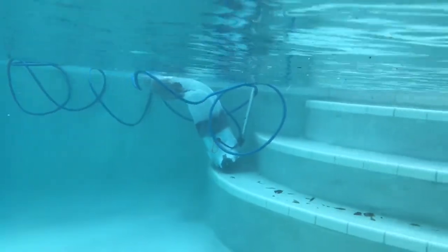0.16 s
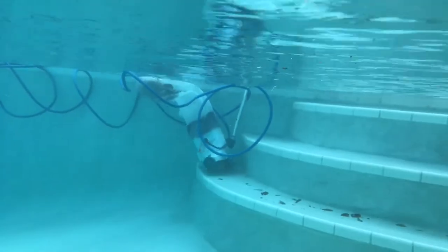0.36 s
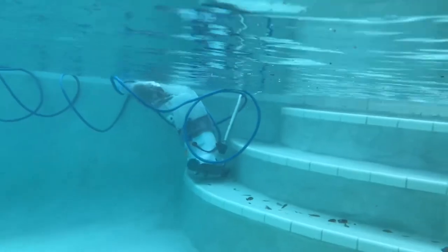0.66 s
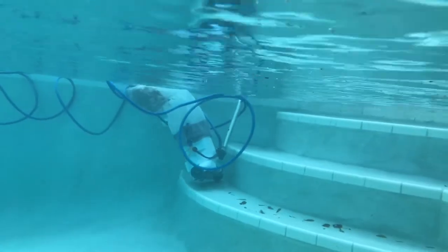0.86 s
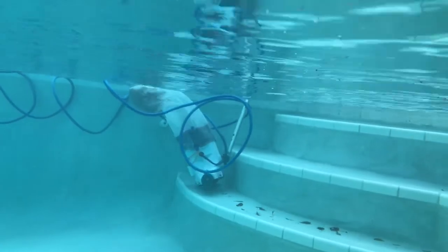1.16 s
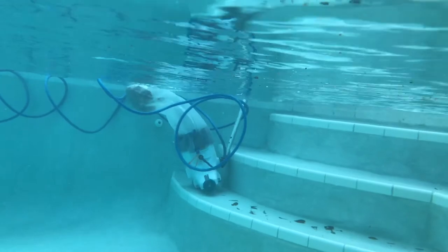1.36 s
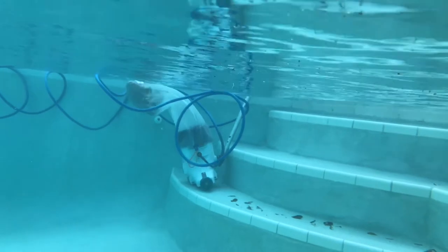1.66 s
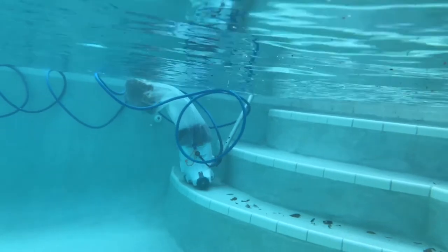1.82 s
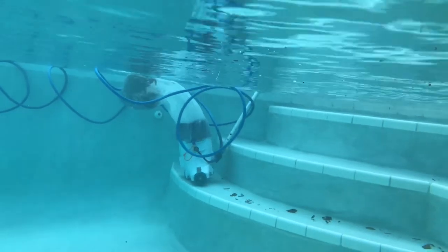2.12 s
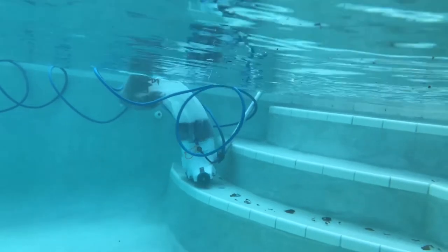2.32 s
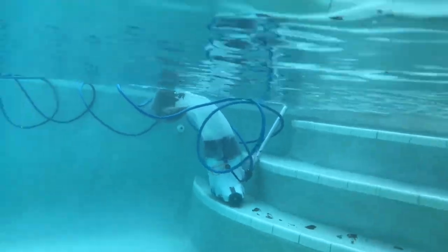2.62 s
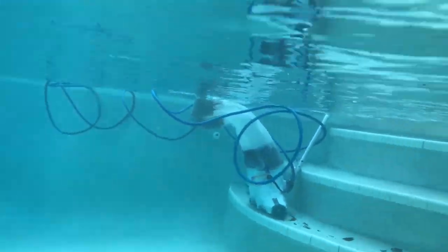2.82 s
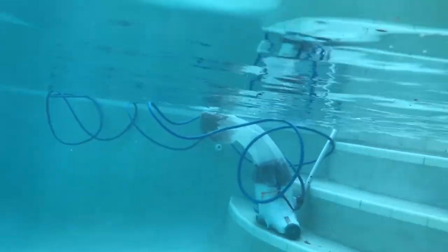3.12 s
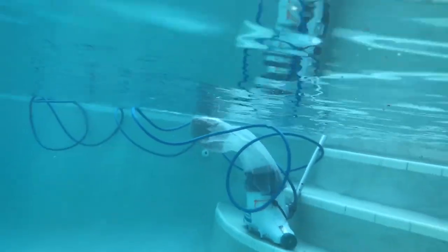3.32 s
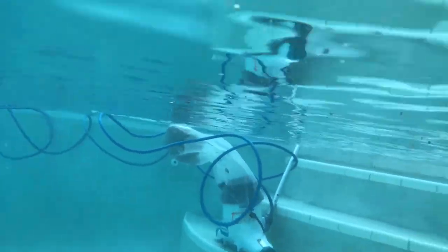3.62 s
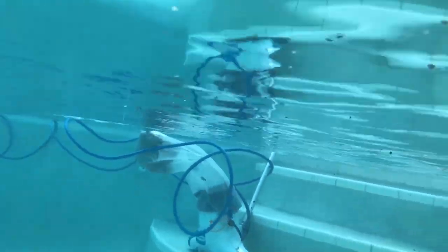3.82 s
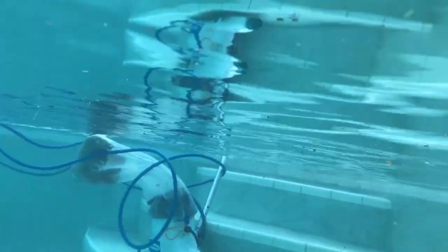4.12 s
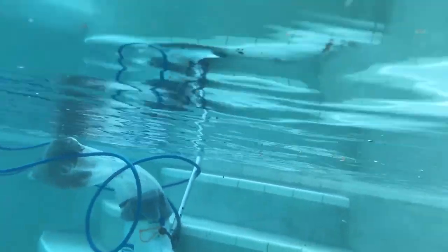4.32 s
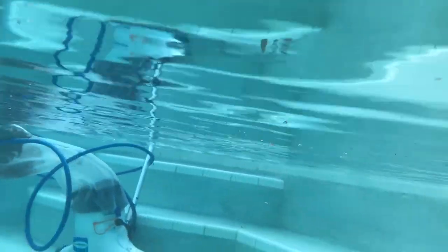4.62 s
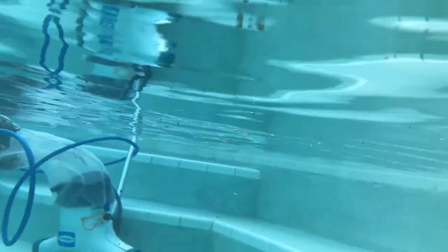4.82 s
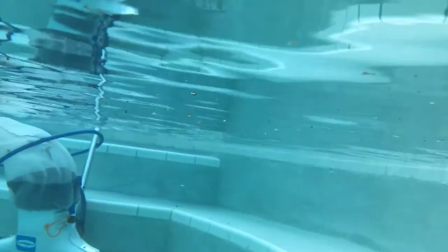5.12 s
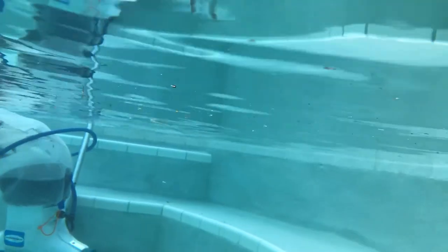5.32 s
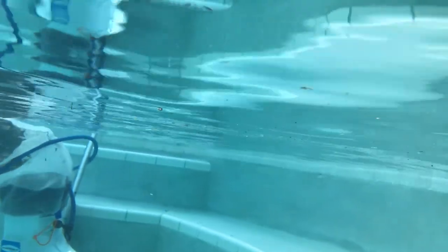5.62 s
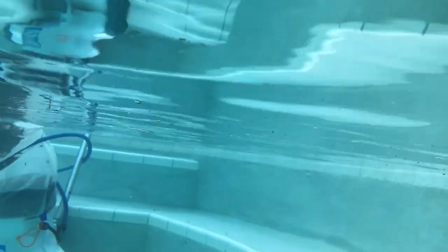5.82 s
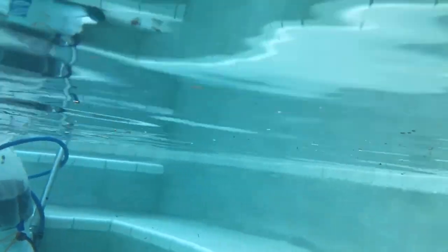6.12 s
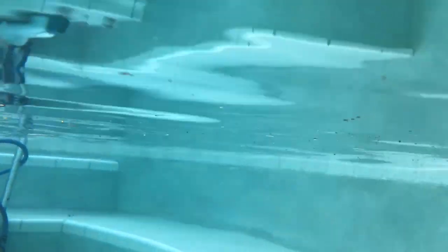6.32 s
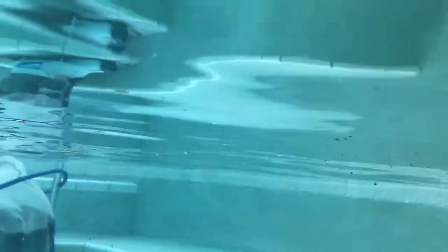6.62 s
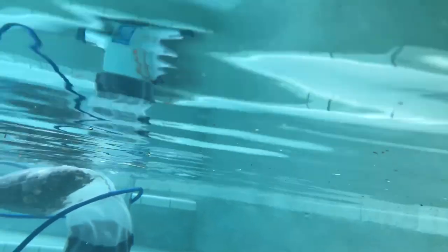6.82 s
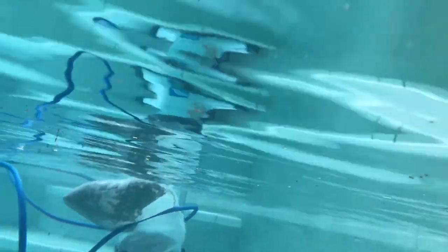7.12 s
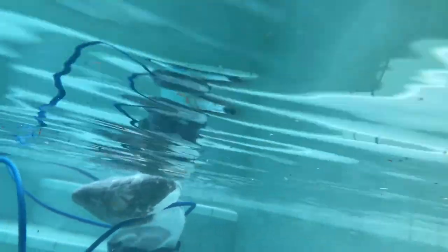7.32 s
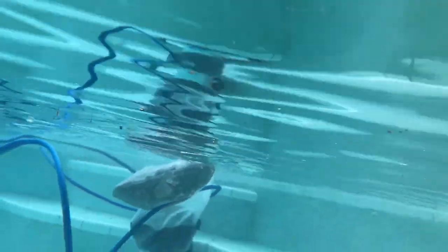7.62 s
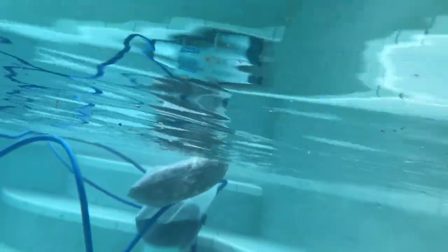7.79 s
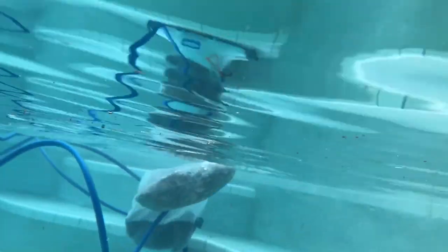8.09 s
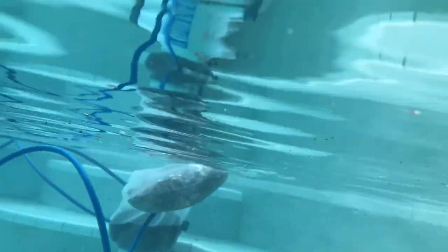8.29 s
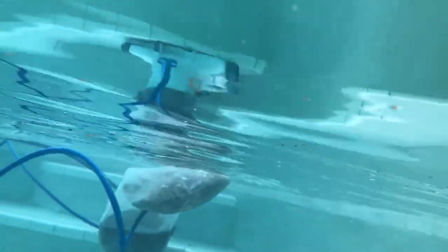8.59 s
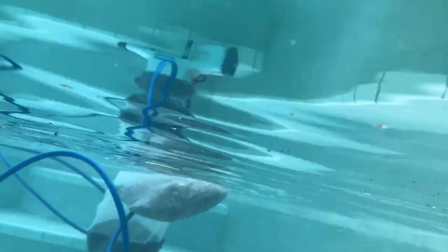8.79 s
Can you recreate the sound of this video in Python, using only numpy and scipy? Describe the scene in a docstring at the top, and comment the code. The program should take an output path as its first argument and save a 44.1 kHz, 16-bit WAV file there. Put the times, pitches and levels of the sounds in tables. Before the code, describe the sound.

A close, boxy underwater capture: rough mid-range pump drone resonates in a plastic housing, wavering with the water. Handling noise dominates in bursts: hard knocks with short hollow rings, scratchy skin rubs and dry plastic snaps, loudest just after five seconds. Between them are little bubble pings, deep soft glugs, low pressure slosh and thin crackling fizz. The drone gets brighter in the second half, and no knocks follow seven seconds, only lighter ticks.

```python
"""Underwater pump heard through a camera housing

A pool cleaner's pump drones under water: noise excites the resonant modes of a hand-held camera's shell.
Fingers knock (decaying modal sines), rub (noise gated by stick-slip) and tick (filtered noise bursts) on it.
Bubbles ping and gurgle as damped sines of gliding pitch; low glugs are sines that fall in pitch.
Behind them, shaped noise of wavering level makes the swish, the low slosh and the fizz of moving water.
"""
import sys
import numpy as np
from scipy import signal
from scipy.fft import rfft, irfft, next_fast_len
from scipy.io import wavfile
from scipy.ndimage import uniform_filter1d

SR = 44100
rng = np.random.default_rng(int(sys.argv[2]) if len(sys.argv) > 2 else 0)


def how_loud(loudness_db):
    """Turn decibels into a plain amplitude multiplier (0 dB gives 1, 20 dB gives 10)."""
    steps = np.asarray(loudness_db, float) / 20
    return 10 ** steps


def waveform_to_disk(signal):
    """Save audio, clipped to [-1, 1], as 16-bit WAV at the path in sys.argv[1]."""
    frames = np.transpose(np.atleast_2d(signal))
    scaled = np.clip(frames, -1, 1) * 32767
    samples = np.round(scaled).astype(np.int16)
    wavfile.write(sys.argv[1], SR, samples)


N = 394694  # length [samples]

# Modes of the plastic shell, two lowest first, main ones from the sixth:
# (frequency [Hz], nominal width [Hz], relative level [dB], share of the upper modes' swell [ratio])
HOUSING_MODES = [(156, 150, 2, 0), (247, 39, 3.5, 0), (308, 120, -17, 0), (482, 94, -1.5, 0),
                 (702.4, 102, -3.5, 0), (1030, 58, 0, 0.28), (1110, 101, -2, 0), (1249.6, 94, 2, 0),
                 (1430, 119, -8, 0.99), (1578, 104, -11, 1.05), (1693, 68, -13, 0.99), (2040, 69, -21, 0.4),
                 (2220, 180, -51, 0), (2360, 67, -51, 0.24), (3250, 98, -37, 0)]
# Pump drive of the shell: (time [s], main modes [dB], upper modes [dB], mode just above the main ones [dB])
PUMP_DRIVE = [(0.0, -29.5, -38.5, -29), (0.4, -25, -39.5, -36.5), (0.77, -29, -35.5, -40.5),
              (1.17, -30, -36, -39), (1.57, -29.5, -39.5, -33.5), (2.02, -28.5, -37, -36.5),
              (2.57, -26.5, -41.5, -35.5), (3.01, -27.5, -40.5, -33), (3.39, -24, -38.5, -36),
              (3.96, -27.5, -37, -42), (4.34, -26.5, -38, -39), (5.08, -28.5, -30, -29.5),
              (5.31, -32.5, -36, -36), (5.58, -30, -32.5, -32.5), (5.98, -31, -30, -28.5),
              (6.43, -36.5, -33.5, -30.5), (6.9, -29.5, -26, -27.5), (7.25, -32, -29.5, -32),
              (7.65, -29, -27, -29), (8.3, -33.5, -30, -32), (8.95, -35, -25, -35.5)]
# Blows of the fingers: (time [s], peak of the ring [dB], favoured frequency [Hz], time scale of the swell [ms])
KNOCKS = [(0.3896, -19, 1150, 2.1), (0.402, -11.5, 1200, 3), (1.382, -10, 1590, 2.4),
          (1.385, -1.5, 1430, 3.3), (1.4008, -11.5, 1140, 4.3), (2.7205, -4, 1110, 2.5),
          (2.727, -0.5, 1210, 2.2), (2.7352, -3, 1110, 2.9), (2.7537, -5, 1070, 4.3), (2.76, -5, 1150, 1.8),
          (2.77, -6.5, 1090, 2.5), (2.9854, -13, 1090, 2.4), (2.9617, -10, 1090, 4),
          (3.1064, -13, 1120, 1.1), (3.1891, -12, 1020, 7.7), (3.409, -7, 1200, 2.2),
          (3.4543, -4, 1170, 1.4), (3.479, -3.5, 1050, 2.4), (3.491, -8, 1040, 2),
          (3.4968, -1.5, 1070, 2.6), (3.538, -14.5, 1110, 1.2), (3.5645, -8.5, 1230, 2),
          (3.7602, -7, 1030, 6.2), (3.8015, -11.5, 1110, 2.4), (3.8253, -9, 1110, 4.3),
          (3.9214, -6, 1020, 5.4), (4.2632, -10, 1110, 3), (4.4878, -12, 1090, 2.7),
          (5.192, -5.5, 1110, 2.1), (5.2178, 3.5, 1190, 2.5), (5.2239, 3, 1420, 1.4),
          (5.2295, 0.5, 1420, 0.49), (5.2585, -7, 1030, 3.2), (5.9119, -11, 1030, 2.1),
          (5.9355, -13, 1050, 3.8), (6.0629, -5, 1240, 3.1), (6.095, -11.5, 1430, 2.1),
          (6.164, -3.5, 1430, 3.6), (6.1712, -6.5, 1450, 3), (6.4855, -7, 1220, 1.6),
          (6.5192, -6, 1440, 1.7), (6.525, -14, 1300, 0.89), (6.5702, -17, 1190, 2.1),
          (6.686, -11, 1030, 1.6), (6.7509, -10.5, 1180, 2.3), (6.7757, -11.5, 1020, 1.5),
          (6.8624, -9.5, 1110, 1.2), (6.8835, -4, 1300, 1.6), (6.9046, -2.5, 1500, 1.4),
          (6.9097, -10, 1020, 2.2), (6.9304, -4.5, 1000, 1.3), (6.938, -6, 1100, 0.74)]
# Finger strokes: (start [s], rise [s], fall [s], relative levels of shell [dB], scratch [dB], rumble [dB])
RUBS = [(1.384, 0.0089, 0.054, -29, -36, -41), (2.679, 0.031, .02, -26, -60, -30),
        (2.718, .004, 0.068, -14.5, -21.5, -23), (2.745, 0.016, .11, -29, -35.5, -33.5),
        (2.935, 0.027, 0.056, -23, -35, -36.5), (3.403, 0.0086, 0.026, -19, -30, -34.5),
        (3.43, 0.066, 0.028, -18.5, -29.5, -28.5), (3.554, 0.011, 0.11, -31, -39.5, -36),
        (5.204, 0.0052, 0.1, -14.5, -29, -31.5), (5.84, 0.039, .09, -27, -44, -41),
        (6.45, 0.02, 0.084, -20.5, -41, -34.5), (6.499, 0.031, .035, -23, -35, -36),
        (6.682, 0.031, 0.036, -17, -32, -29.5), (6.749, 0.042, .05, -27, -36.5, -35.5),
        (6.835, 0.029, 0.07, -23, -30.5, -33), (6.905, 0.026, 0.021, -16, -28, -28.5),
        (6.951, 0.0089, 0.026, -22, -30, -37)]
# Spectrum of skin scratching on plastic: (frequency [Hz], relative density [dB per Hz])
SCRATCH_SPECTRUM = [(1120, -46), (1900, -25), (2170, 15), (2560, 1.5), (3250, -2), (5040, -15.5),
                    (7090, -26.5), (8380, -18.5), (15500, -74)]
# Snaps of plastic: (time [s], peak of the body [dB], centre [Hz], top band against the body [dB])
TICKS = [(0.0474, -28, 2360, -21), (0.2668, -38, 4240, -14), (0.3653, -29, 3250, -35),
         (0.398, -31, 3170, -12), (1.381, -20, 2560, -17.5), (1.5274, -22, 2640, -13),
         (2.064, -26.5, 2660, -16), (2.7213, -10.5, 2770, -13), (2.9432, -24, 3070, -10.5),
         (3.0515, -29, 2650, -31), (3.237, -24.5, 2710, -17), (3.29, -27, 2560, -14),
         (3.3792, -31, 3200, -9), (3.4101, -20.5, 3450, -16), (3.539, -34, 2400, -25),
         (3.5652, -34, 2500, -20), (3.5962, -23.5, 2670, -18), (3.7025, -20, 2370, -25),
         (3.7334, -27, 2650, -19.5), (3.7564, -17, 2550, -20), (3.8, -33, 2400, -19),
         (3.823, -23.5, 2580, -18), (3.8581, -33, 3300, -19), (3.894, -29, 2500, -18),
         (3.92, -10.5, 2400, -26), (3.9474, -25, 2500, -17), (3.9687, -28, 3070, -11),
         (3.997, -31, 2500, -28), (4.1036, -36, 2760, -18.5), (4.2388, -35, 2830, -15),
         (4.2612, -22.5, 2720, -16), (4.49, -22.5, 2650, -21), (4.979, -24, 2810, -20),
         (5.2083, -19.5, 2660, -20), (5.294, -33, 3500, -20), (5.8272, -35, 3770, -13),
         (5.8805, -26, 2680, -16), (6.0657, -25, 2580, -13), (6.1639, -21, 2880, -18),
         (6.4602, -43, 2720, -20.5), (6.765, -28, 2560, -16), (6.8409, -30, 2990, -11),
         (6.956, -24, 2690, -7.5), (6.988, -44, 5300, -15), (7.0155, -23, 2700, -21),
         (7.038, -14.5, 2960, -20), (7.0873, -29.5, 2630, -6), (7.1644, -27, 3220, -8),
         (7.565, -31, 2620, -15), (7.9134, -34, 2900, -26), (8.0581, -37, 2800, -21),
         (8.1394, -41, 3200, -16), (8.2322, -38, 2700, -7), (8.611, -30.5, 2920, -5.5),
         (8.739, -27, 2940, -7)]
# Small bubbles: (time [s], peak [dB], final pitch [Hz])
PINGS = [(1.6212, -33, 2200), (2.4937, -30, 2110), (2.5516, -29, 2140), (4.7077, -26, 2170),
         (4.9801, -20, 2140), (5.8636, -19.5, 2160), (7.208, -30, 2120), (7.4914, -32, 2160),
         (7.9528, -25.5, 2280), (8.0644, -35, 2040), (8.1389, -34, 2050)]
# Larger bubbles passing the shell: (time [s], peak [dB], final pitch [Hz], 60 dB decay time [s])
GURGLES = [(.35, -31, 490, 0.045), (.4, -32, 654, 0.036), (.49, -30, 850, 0.044), (.535, -42, 850, .04),
           (.65, -42, 875, .04), (.75, -41, 760, .05), (.775, -30, 627, 0.057), (.815, -33, 750, .04),
           (.82, -34.5, 457, 0.33), (.905, -31, 468, .07), (1.325, -33, 560, .05),
           (5.218, -14.5, 688, 0.065), (5.455, -28, 690, 0.032)]
# Pushes of water on the microphone: (time [s], peak [dB], final pitch [Hz], 60 dB decay time [s])
GLUGS = [(0.37, -27, 70.6, 0.059), (1.014, -25, 70.5, 0.055), (1.048, -26, 75.5, 0.073),
         (1.106, -28, 61, 0.075), (1.204, -28, 68, 0.058), (5.889, -23, 71, 0.084), (6.271, -20, 55, 0.069),
         (6.364, -33, 55, 0.039), (6.41, -26, 50.3, 0.082), (6.577, -27, 60, 0.042),
         (6.611, -30, 55.3, .07), (6.666, -27, 65, 0.045), (7.098, -37, 44.7, 0.12), (8.741, -24, 80, 0.08)]
# Swish of water past the shell: (time [s], level [dB])
SWISH_LEVEL = [(.35, -55), (.4, -49.5), (.55, -48.5), (.7, -46.5), (.78, -45.5), (1.05, -65)]
# Spectrum of the swish: (frequency [Hz], relative density [dB per Hz])
SWISH_SPECTRUM = [(1800, -35), (2500, -0.5), (2950, -7), (3280, -1.5), (3800, -18), (5400, -18),
                  (7000, -27), (10000, -61)]
# Water pressure: (time [s], relative level of the slosh [dB], drive of the shell's lowest ring [dB])
SLOSH_LEVEL = [(0, -46, -47), (.47, -47, -44), (.69, -51, -36), (.87, -46, -53), (1.0, -46, -45),
               (1.49, -51, -44), (1.76, -44.5, -50.5), (1.97, -53.5, -57.5), (2.14, -50, -46.5),
               (2.3, -55, -57), (2.72, -48.5, -58), (2.95, -50, -42), (3.25, -59, -46.5), (3.55, -47, -52),
               (3.75, -52.5, -61), (4.6, -48.5, -57.5), (5.36, -52, -55), (5.74, -47, -52),
               (5.93, -37, -40.5), (6.1, -50, -43), (6.55, -40, -47), (6.86, -46.5, -36.5),
               (7.15, -41.5, -47.5), (7.9, -45, -46), (8.5, -46, -51.5), (8.78, -44.5, -38),
               (8.85, -47, -48.5), (8.95, -47, -46)]
# Spectrum of the slosh: (frequency [Hz], relative density [dB per Hz])
SLOSH_SPECTRUM = [(12, -19), (20, -22.5), (49, 6), (97, 3), (125, -5.5), (200, -5.5), (260, -30),
                  (440, -120)]
# Fizz of moving water: (time [s], relative level [dB])
FIZZ_LEVEL = [(0.0, -52), (0.69, -49.5), (0.92, -51), (1.79, -54), (2.74, -49), (2.91, -44), (3.66, -49.5),
              (4.01, -49), (5.71, -50.5), (5.98, -44), (6.43, -51.5), (6.9, -44.5), (7.15, -53),
              (8.95, -50.5)]
# Spectrum of the fizz: (frequency [Hz], relative density [dB per Hz])
FIZZ_SPECTRUM = [(1060, -11), (1800, 0.5), (1900, -5), (2230, -3), (2580, -11.5), (3230, -16.5),
                 (6470, -34), (8320, -37.5), (12700, -37), (15500, -43)]
# Resonances of the microphone port: (frequency [Hz], width [Hz])
PORT_RESONANCES = [(8450, 1400), (11700, 1400)]

FAR_DB = -40.5  # upper-mode drive with the camera far off; nearness counts from here


def evened(x):
    """Normalisation to unit rms, so that a later gain sets the level."""
    return x / np.sqrt(np.mean(x ** 2) + 1e-20)


def peaked(x, db):
    """Normalisation of a transient to a peak level in dB."""
    return how_loud(db) * x / (abs(x).max() + 1e-12)


def curve(rows, t):
    """Linear interpolation of each table column at the times t."""
    times, *columns = np.transpose(rows)
    return [np.interp(t, times, column) for column in columns]


def add(mix, start_s, sound):
    """Superposition of a sound on the mix from start_s on."""
    part = mix[round(start_s * SR):][:len(sound)]
    part += sound[:len(part)]


def resonate(x, hz, width):
    """Simple resonance: one damped complex pole, of about unit gain at its centre."""
    pole = np.exp((2j * np.pi * hz - np.pi * width) / SR)
    return 2 * signal.lfilter([1 - abs(pole)], [1, -pole], x).real


def band(x, lo_hz, hi_hz):
    """Band-pass filtering with a maximally flat passband."""
    return signal.sosfilt(signal.butter(2, [lo_hz, hi_hz], "band", fs=SR, output="sos"), x)


def drift(smooth_s):
    """Slow random fluctuation of unit rms: white noise averaged twice."""
    size = max(round(smooth_s * SR), 1)
    smooth = uniform_filter1d(rng.standard_normal(N), size)
    return evened(uniform_filter1d(smooth, size))


def coloured(spectrum, size=N):
    """Spectral shaping: white noise weighted by a density curve over log frequency."""
    hz, db = np.transpose(spectrum)
    bins_hz = np.fft.rfftfreq(size, 1 / SR) + 1  # 1 Hz up, to avoid log 0
    gain = how_loud(np.interp(np.log(bins_hz), np.log(hz), db))
    return evened(irfft(rfft(rng.standard_normal(size)) * gain, size))


def wandered(x, shift_hz):
    """Frequency shift: the analytic signal turned by the running phase of shift_hz."""
    analytic = signal.hilbert(x, next_fast_len(len(x)))[:len(x)]
    return (analytic * np.exp(2j * np.pi * np.cumsum(shift_hz) / SR)).real


def pump(t):
    """Forced modal vibration: lumpy churn excites the shell; upper modes swell as the camera nears."""
    main_db, upper_db, next_db = curve(PUMP_DRIVE, t)
    main_db, upper_db, next_db = main_db + 0.24, upper_db - 0.15, next_db - 0.5
    low_db = -48 + 0.57 * (upper_db - FAR_DB)  # follows part of the nearness
    ring_db = curve(SLOSH_LEVEL, t)[1]  # the two lowest modes answer the water pressing on the shell
    churn = rng.standard_normal(N) * how_loud(1.3 * drift(0.0015) + 0.7 * drift(0.04))
    out = np.zeros(N)
    for k, (hz, width, mode_db, share) in enumerate(HOUSING_MODES):
        once = resonate(churn, hz, 1.16 * width)
        mode = evened(resonate(once, hz, 1.16 * width))  # twice for steep flanks
        if 5 <= k < 11:  # these modes slide about as water shifts on the shell
            mode = wandered(mode, 13 * drift(0.05))
        if k < 2:
            drive_db = ring_db + (-3, -0.5)[k] + 4 * drift(0.071)
        elif k < 5:
            drive_db = low_db
        elif k == 7:
            drive_db = next_db
        else:
            drive_db = main_db + share * (upper_db - main_db + 7.0)
        level_db = mode_db + drive_db + 0.7 * drift(0.021)  # each mode wavers on its own
        out += (-1) ** k * mode * how_loud(level_db)
    return out


def knock(start_s, db, favoured_hz, swell_ms):
    """Impulsive modal excitation: a padded blow swells and dies, favouring modes near the struck spot's."""
    t = np.arange(round(0.06 * SR)) / SR
    u = t / (swell_ms / 1000)
    ring = np.zeros(len(t))
    for hz, width, mode_db, share in HOUSING_MODES[5:]:
        phase_turns, spread = rng.random(2)
        lean_db = 12 / (1 + ((hz - favoured_hz) / 150) ** 2) + 6 * abs(np.log2(hz / 1100)) + 4 * spread
        if hz == HOUSING_MODES[7][0]:
            lean_db -= 7
        damping = np.exp(-u * hz / 6000)  # higher modes die sooner
        ring += how_loud(mode_db + lean_db) * np.sin(2 * np.pi * (hz * t + phase_turns)) * damping
    ring *= u ** 1.14 * np.exp(-1.3 * u)
    thud = sum(np.sin(2 * np.pi * (HOUSING_MODES[k][0] * t + rng.random())) for k in (1, 3))
    thud *= (1 - np.exp(-t / 0.00046)) * how_loud(-60 * t / 0.016)
    # The thud grows with the drive of the shell's lowest ring.
    thud_db = -18.5 + 0.96 * (curve(SLOSH_LEVEL, start_s)[1] + 48)
    return start_s, peaked(ring, db) + peaked(thud, db + thud_db)


def housing(x):
    """Modal filtering by the shell from the main modes up, with damping raised by the skin's touch."""
    out = np.zeros(len(x))
    for hz, width, mode_db, share in HOUSING_MODES[5:]:
        lean_db = 7 * abs(np.log2(hz / 1100))
        mode = resonate(resonate(x, hz, 1.75 * width), hz, 1.75 * width)
        out += how_loud(mode_db + lean_db) * mode
    return out


def rub(start_s, rise, fall, shell_db, scratch_db, rumble_db):
    """Stick-slip friction: random slips modulate noise; the stroke swells to a peak and fades."""
    t = np.arange(0, rise + fall, 1 / SR)
    swell_db = -12 * (1 - t / rise)
    drop_db = -20 * (abs(t - rise) / fall) ** 0.86
    fade_db = np.where(t < rise, swell_db, drop_db)
    slip_sizes = how_loud(8.1 * np.minimum(rng.exponential(1, len(t)), 2))
    slips = (rng.random(len(t)) < 220 / SR) * slip_sizes  # about 220 a second
    grip = evened(2.2 + signal.lfilter([1], [1, -np.exp(-1 / (0.0024 * SR))], slips))
    shell = evened(housing(rng.standard_normal(len(t)) * grip))
    scratch = coloured(SCRATCH_SPECTRUM, len(t)) * grip
    rumble = evened(band(band(rng.standard_normal(len(t)), 113, 424), 89, 1340))
    stroke = how_loud(shell_db + fade_db) * shell
    stroke += how_loud(scratch_db + 4.0 + 0.75 * fade_db) * scratch
    stroke += how_loud(rumble_db + 5.5 + 0.94 * fade_db) * rumble
    return start_s, stroke * signal.windows.tukey(len(t), 0.06)


def tick(start_s, db, hz, top_db):
    """Broadband impulse through a resonance: pitched body, broad crack and short fuzzy tail of plastic."""
    t = np.arange(round(0.08 * SR)) / SR
    t60_s = 0.034  # decay of the tail
    fall = how_loud(-60 * t / (0.087 * t60_s)) + 0.5 * how_loud(-60 * t / t60_s)
    snap = rng.standard_normal(len(t)) * fall * (1 - np.exp(-t / 0.0009))
    body = peaked(resonate(band(snap, 0.16 * hz, 1.65 * hz), hz, 740), db)
    crack = peaked(band(snap, hz, 2.12 * hz), db - 15)
    top = peaked(band(snap, 8400, 13000), db + top_db)
    return start_s, body + crack + top


def faint_ticks(count=16):
    """Uniform random scatter of small plastic snaps of varied pitch."""
    out = np.zeros(N)
    for when, size, pitch, top in rng.random((count, 4)):
        add(out, *tick(when * N / SR, -44 + 7 * size, 2500 + 1800 * pitch ** 2, -17 + 12 * (top - 0.5)))
    return out


def bubble(start_s, db, hz, t60_s, glide):
    """Damped oscillation of an air pocket: pitch starts at (1 + glide) times hz and settles on hz."""
    t = np.arange(round(0.15 * SR)) / SR
    pitch_hz = hz * (1 + glide * np.exp(-t / (0.053 * t60_s)))
    turns = np.cumsum(pitch_hz) / SR
    envelope = how_loud(-60 * t / t60_s) * (1 - np.exp(-t / 0.0013))
    return start_s, peaked(np.sin(2 * np.pi * turns) * envelope, db)


def specks(count=220):
    """Uniform random scatter of tiny bubbles, on the whole fainter the higher they ring."""
    out = np.zeros(N)
    for when, pitch, size in rng.random((count, 3)):
        hz = 1900 * 5 ** pitch
        peak_db = -46 - 11 * np.log2(hz / 2000) + 9 * size ** 2
        add(out, *bubble(when * N / SR, peak_db, hz, 0.015, glide=-0.054))
    return out


def swish():
    """Flow noise: a passing uneven wash, brightest around 2.5 to 3.3 kHz."""
    t = np.arange(SWISH_LEVEL[0][0], SWISH_LEVEL[-1][0], 1 / SR)
    level_db = curve(SWISH_LEVEL, t)[0] + 3.4 * drift(0.015)[:len(t)]
    wash = coloured(SWISH_SPECTRUM, len(t)) * how_loud(level_db)
    return t[0], wash * signal.windows.tukey(len(t), 0.15)


def slosh(t):
    """Low-frequency pressure fluctuation: lumpy noise of water against the microphone."""
    waver_db = 2.5 * drift(0.031) + 1.5 * drift(0.089)
    return coloured(SLOSH_SPECTRUM) * how_loud(curve(SLOSH_LEVEL, t)[0] + 1.5 + waver_db)


def fizz(t):
    """Amplitude modulation by sparse impulses: hiss of moving water and port resonances, with a crackle."""
    pop_sizes = how_loud(3.5 * np.minimum(rng.exponential(1, N), 2))
    pops = (rng.random(N) < 25 / SR) * pop_sizes  # about 25 a second
    crackle = signal.lfilter([1], [1, -np.exp(-1 / (0.0031 * SR))], pops)
    hiss = coloured(FIZZ_SPECTRUM) * how_loud(curve(FIZZ_LEVEL, t)[0] + 8.5 + 2.15 * drift(0.022))
    near_db = uniform_filter1d(curve(PUMP_DRIVE, t)[1], SR) - FAR_DB  # smoothed over 1 s
    # Each port resonance: level far off [dB], share of the nearness it follows.
    for (hz, width), far_db, share in zip(PORT_RESONANCES, (-69, -74.5), (0.05, 0.65)):
        port = evened(band(rng.standard_normal(N), hz - width / 2, hz + width / 2))
        hiss += port * how_loud(far_db + share * near_db)
    return hiss * np.sqrt(1 + 0.45 * crackle ** 2)


def scene():
    """Linear superposition of all sources at one microphone."""
    t = np.arange(N) / SR
    mix = pump(t) + faint_ticks() + specks() + slosh(t) + fizz(t)
    for row in KNOCKS:
        add(mix, *knock(*row))
    for row in RUBS:
        add(mix, *rub(*row))
    for row in TICKS:
        add(mix, *tick(*row))
    for row in PINGS:
        add(mix, *bubble(*row, t60_s=0.043, glide=-0.021))
    for row in GURGLES:
        add(mix, *bubble(*row, glide=-0.05))
    for row in GLUGS:
        add(mix, *bubble(*row, glide=4.59))
    add(mix, *swish())
    return mix[None]


def top_cut(x):
    """Nothing passes above the cut-off."""
    return signal.sosfilt(signal.butter(12, 16360, fs=SR, output="sos"), x)


def record(dry):
    """Saturation and band limiting: soft overload on the loudest peaks, then a steep low-pass."""
    overloaded = 1.353 * np.tanh(dry / 1.645)
    lowpass = signal.firwin(301, 15800, fs=SR)[None]
    mix = signal.oaconvolve(overloaded, lowpass, "same")
    return top_cut(mix)


dry = scene()
out = record(dry)
waveform_to_disk(out)
```